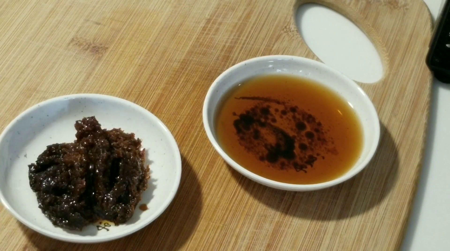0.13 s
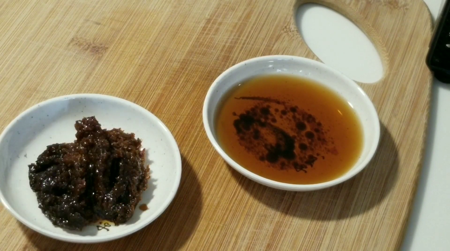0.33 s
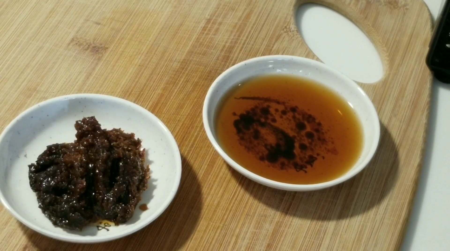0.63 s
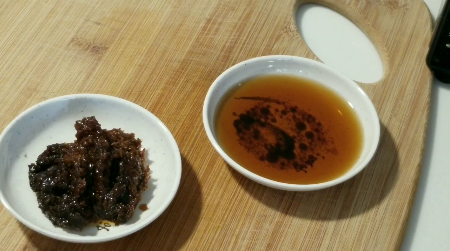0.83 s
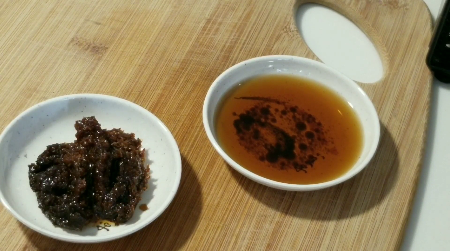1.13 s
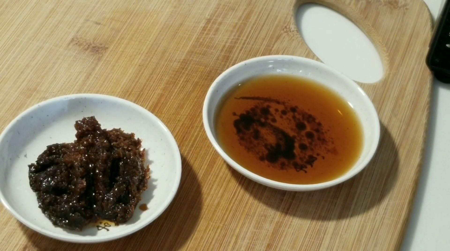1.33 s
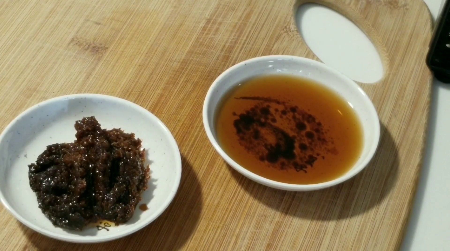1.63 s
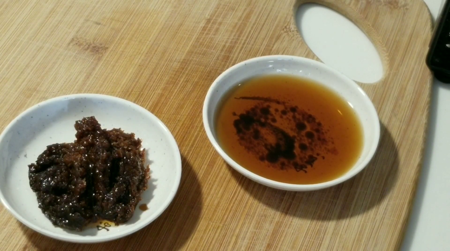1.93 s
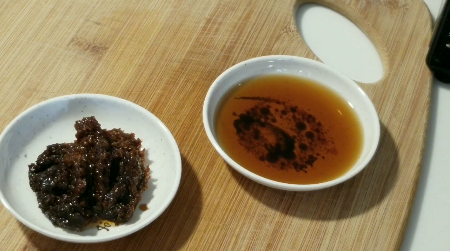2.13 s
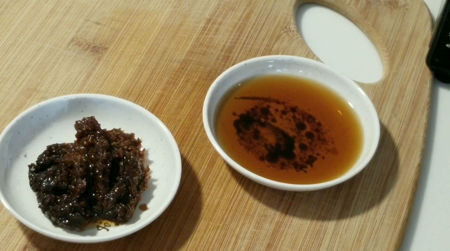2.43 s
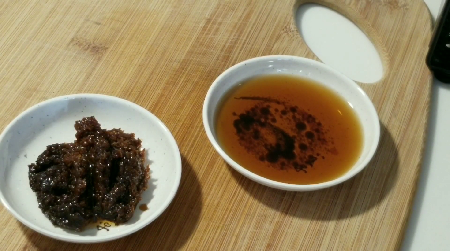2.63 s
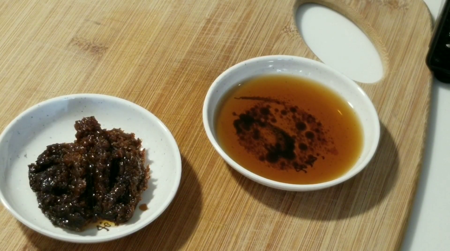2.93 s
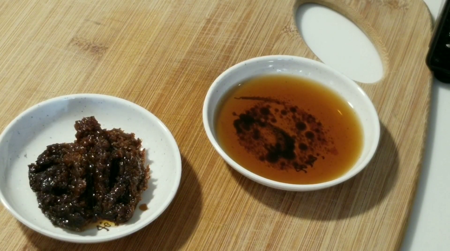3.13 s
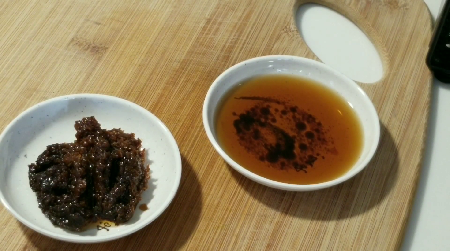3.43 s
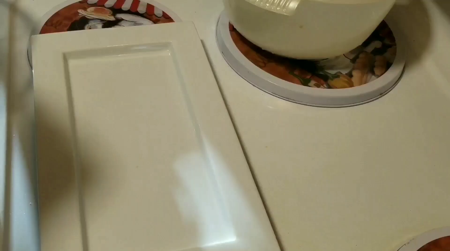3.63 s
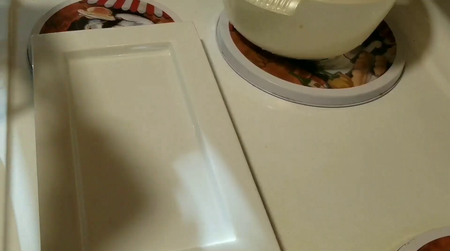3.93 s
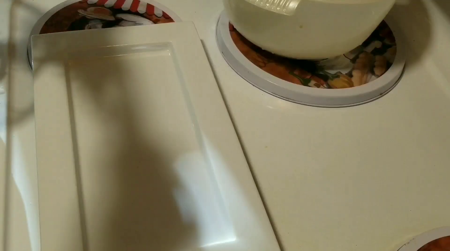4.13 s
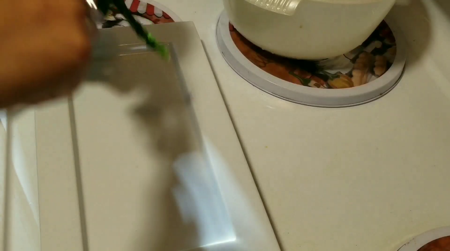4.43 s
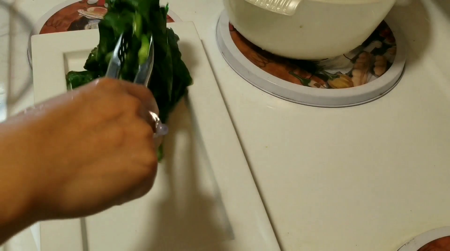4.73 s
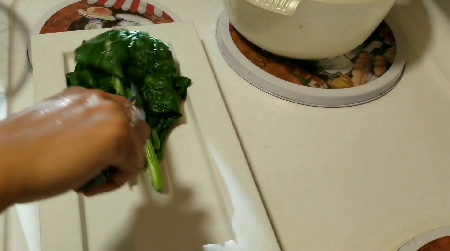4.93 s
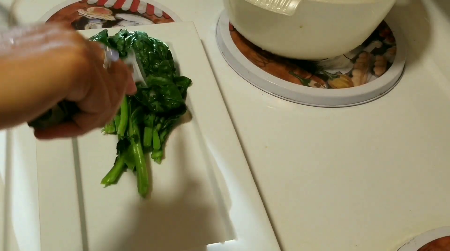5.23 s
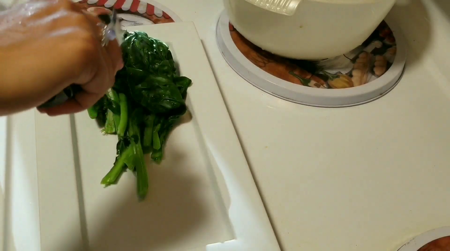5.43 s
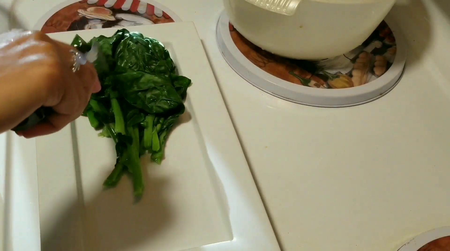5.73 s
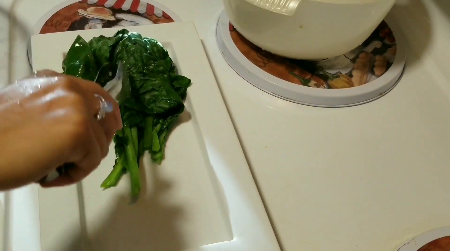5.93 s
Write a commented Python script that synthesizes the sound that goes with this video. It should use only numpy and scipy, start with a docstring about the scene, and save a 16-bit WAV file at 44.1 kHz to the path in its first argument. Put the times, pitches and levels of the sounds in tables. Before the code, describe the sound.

A small dish is set down hard and slid, a spoon clinks as dishes rock, then metal tongs click once over a faint hum.

```python
"""A kitchen counter in a small hard room, a two-port stereo microphone close by. First a dish is set down
hard, so that dish and counter ring, and is slid along. From 1.6 s a spoon clinks in a small dish; a dish
rocks on its foot, taps a board and is dragged. At 3 s we cut to a second spot with its own hum and air
noise: a faint far ping, wet leaves rustling and, near 4.9 s, metal tongs ticking on a tray."""
import sys
import numpy as np
from scipy import signal
from scipy.fft import rfft, irfft, next_fast_len
from scipy.io import wavfile
from scipy.ndimage import uniform_filter1d

SR = 44100
rng = np.random.default_rng(int(sys.argv[2]) if len(sys.argv) > 2 else 0)


def store_wav(level_fs):
    """Save 16-bit WAV to argv[1]."""
    pcm = np.round(np.clip(np.atleast_2d(level_fs), -1, 1) * 32767)
    wavfile.write(sys.argv[1], SR, pcm.T.astype(np.int16))


N = 268216
TIME, PAD = np.arange(N) / SR, next_fast_len(N)
FFT_HZ = np.fft.rfftfreq(PAD, 1 / SR)
CUT_S = 2.985, 2.988  # crossfade from the first spot to the second
SCATTER_DB, RING_CHATTER = 2.5, .8  # spread of mode levels from blow to blow; phase roughness in radians

# microphone hiss, left port then right: spectrum (f/Hz, density/dB), level/dB
PORT_HISS = [([(1200, -28.5), (2500, -7.5), (3400, -15.5), (4600, -2.5), (7500, -1.5), (9400, -13),
             (10800, -7.5), (12200, 0.5), (14000, -6), (16000, -5)], -62), ([(1200, -30), (2500, -12.5),
             (3400, -11.5), (4600, -15.5), (7500, -9), (9400, -7.5), (10800, -9.5), (12200, 0), (14000, -5),
             (16000, -5.5)], -65)]
# background at each spot: air (f/Hz, density/dB), its level/dB, like (f/Hz, correlation of the ports,
# clipped to +-0.99 in use), pan (left minus right/dB), hum (f/Hz, level/dB)
COUNTER_SPOT = dict(air=[(15, -52), (25, 2.5), (39, -5.5), (59, -8.5), (87, -20), (108, -11), (174, -15),
                (231, -11.5), (250, -20.5), (374, -13.5), (902, -31), (1370, -33.5), (3000, -47.5),
                (3900, -68), (6600, -120)], air_db=-53.5, like=[(60, 4.5), (130, 0.75), (290, 0.87),
                (640, 0.5), (1410, -0.2), (3100, 0), (6820, -2)], pan_db=2, hum=[(59.2, -60),
                (118.4, -66.5), (220.7, -74.5), (12091, -89), (12155, -99)])
TRAY_SPOT = dict(air=[(15, -40), (25, -1.5), (54, -6.5), (87, -10), (134, -12), (250, -14.5), (277, -21),
             (430, -18), (547, -20), (1370, -33), (1890, -29), (2130, -42), (3000, -49.5), (3900, -86),
             (6600, -120)], air_db=-49, like=[(60, 0.99), (130, 0.87), (290, 0.62), (640, 0.63),
             (1410, 0.0096), (3100, 0.42), (6820, 0.17), (15000, 0.54)], pan_db=0.5, hum=[(47, -51.5),
             (59.5, -56.5), (93, -67.5), (140, -58), (186, -64.5), (280, -63.5), (328, -73), (651, -70.5),
             (748, -69.5)])
# ride on the first spot's background: t/s, gain/dB
BACKGROUND_SWELL = [(0, 2), (.7, -0.5), (2.3, -0.5), (2.8, 2), (3.1, 8.5)]
# room decay, before each source shortens it: f/Hz, t60/s
ROOM_T60 = [(150, 0.86), (1000, 0.87), (4000, 0.65), (9000, 0.65), (15000, 0.75)]
# scatter off things near the microphone: f/Hz, level against the direct sound/dB
CLUTTER = [(200, -11), (700, -8), (1500, -13), (3500, -14), (5000, -6), (8000, -1), (16000, -1)]
# balance of each source at the microphone: f/Hz, left minus right/dB
KNOCK_PAN = [(100, -2), (300, 2), (1000, 1.5), (4000, 5.5), (8000, 0.5), (13000, 1)]
CLINK_PAN = [(500, 1.8), (1300, 4.7), (3000, 2.8), (8000, 5.7), (13000, 0.95)]
TONG_PAN = [(1000, -0.33), (4000, 1), (13000, -0.56)]

# fingers in wet leaves: t/s, level/dB, half-width/s
RUSTLES = [(3.996, -68.5, 0.067), (4.166, -75, 0.029), (4.265, -69.5, 0.1), (4.483, -66, .04),
           (5.279, -61, 0.021), (5.342, -66.5, 0.053), (5.972, -66, 0.081)]
# modes of the tray and of the tong tips: f/Hz, level/dB, t60/s
TRAY_MODES = [(1100, -6, .03), (1610, 0, .05), (2060, 10, .1), (2150, 1, .06), (3320, -8, .04)]
TIP_MODES = [(4300, 0, 0.03), (4760, 1, 0.035), (5730, -6, .04), (6560, 7, 0.046), (9000, 3, .035)]
# the tips rattle: t/s, level/dB
TIP_RATTLES = [(4.888, -41), (4.892, -40), (4.896, -42)]
# bright metallic snaps of tongs and spoon: t/s, level/dB, decay/ms
TONG_SNAPS = [(4.884, -31, 6.1), (4.8874, -21.5, 9.8), (4.908, -31, 8.5), (4.921, -38, 11)]
SPOON_SNAPS = [(1.910, -32.5, 11), (1.941, -37, 9.1), (1.9553, -31.5, 6.6), (1.964, -41, 9.8)]
# colour of those snaps: f/Hz, density/dB
TONG_SNAP_SPECTRUM = [(710, -71), (1200, -25), (1730, -10), (3010, -15.5), (3900, -16), (4500, -1),
                      (5800, -8), (6720, -1), (8170, -6), (8700, 0), (11000, -2), (14800, -3),
                      (16000, -3.5)]
SPOON_SNAP_SPECTRUM = [(3000, -24), (6000, -5), (9000, 0), (12000, -4), (14500, 6), (16000, -8)]

# dull taps on the board: t/s, board/dB, hollow/dB, tick/dB
TAPS = [(2.255, -24.5, -55, -41), (2.275, -27.5, -43, -40), (2.351, -37.5, -55, -64),
        (2.397, -52, -58, -72), (2.441, -38.5, -51, -65), (2.56, -55, -49.5, -72), (2.578, -49, -53, -69),
        (2.595, -48, -48, -67), (2.665, -55, -50, -72), (2.908, -56, -47, -68), (2.970, -30, -26, -44),
        (2.979, -46, -33, -43)]
# modes of the board and of the air trapped under the dish: f/Hz, level/dB, t60/s
BOARD_MODES = [(960, 7, 0.015), (1010, 0, 0.022), (1256, 4, 0.025), (1344, -7, 0.085)]
HOLLOW_MODES = [(853, 0.5, 0.11), (956, -13.5, 0.11)]
# contact ticks on the board and on a small dish: f/Hz, density/dB
TAP_TICK_SPECTRUM = [(940, -33), (1600, -10), (2200, 3.5), (2800, -1), (3300, -35), (3800, -3.5),
                     (4300, -8), (5200, 0), (7470, -23), (16000, -20)]
CLINK_TICK_SPECTRUM = [(500, -4.5), (1000, 7), (2500, 6), (3300, -5.5), (4300, -1.5), (5200, 3),
                       (7000, -3.5), (9500, -7), (13000, -9.5), (16000, -7)]
# low, middle and high ring of the small dishes, one list each: f/Hz, level/dB, t60/s
SMALL_DISH_RINGS = [
    [(1990, 0, 0.066), (2070, -5, .12), (2210, -7, 0.24)],
    [(2697, -8, 0.5), (2745, -3, 0.13), (2930, -9, .1), (3310, -12, .1), (3570, -7, 0.09)],
    [(5040, -2, 0.25), (5200, -2, 0.06), (5840, -12, .1), (6520, -8, 0.1)],
]
# a dish rocks, the spoon rattling in it:
# t/s, body/dB, rings/dB, rattle/dB, tick/dB, body f/Hz, ring length factor, contact f/Hz, contact/dB
ROCKS = [(1.911, -34, -38, -30, -41, 1320, 1.1, 6860, -42.5),
         (1.924, -38, -48, -37, -37.5, 1356, 1.6, 2300, -56),
         (1.954, -18.5, -44, -43, -34.5, 1301, 1.3, 4140, -41.5),
         (1.968, -30, -51, -40, -51, 1267, 0.6, 3520, -49),
         (2.014, -43, -55, -60, -61, 1290, 1.1, 2390, -66),
         (2.024, -37.5, -50, -54, -43, 1283, 1.1, 3930, -57),
         (2.054, -16, -37, -58, -37, 1272, 0.25, 4000, -47),
         (2.064, -32.5, -35, -57, -41, 1210, 1, 2320, -60),
         (2.091, -35, -45, -55, -43, 1330, 1.1, 5000, -48),
         (2.105, -27.5, -40, -57, -48, 1170, 0.44, 2780, -60),
         (2.112, -31, -59, -68, -54, 1192, 0.55, 2490, -51),
         (2.18, -36.5, -38.5, -63, -45, 1240, 0.45, 3720, -53),
         (2.187, -38.5, -45, -62, -49, 1038, 1.2, 2690, -53)]
# the spoon bounces: t/s, body/dB, low ring/dB, middle ring/dB, high ring/dB, tick/dB, ring length factor
SPOON_BOUNCES = [(1.62, -54, -58, -50, -62, -45, 0.39), (1.6302, -26.5, -34, -27, -34, -27, 0.51),
                 (1.649, -42, -40, -36.5, -41, -39, 0.46), (1.662, -42, -42, -40, -47, -39, 0.59),
                 (1.687, -49, -56, -38.5, -57, -46, 1), (1.785, -44, -41, -43, -62, -42, 0.18)]

# the dish is pushed along: scrape t/s, scrape/dB, scrape fade/(dB/s), rumble t/s, rumble/dB
PUSHES = [(0.421, -34.5, 153, 0.451, -37), (0.525, -35.5, 223.5, 0.51, -45)]
# its grating foot, its thin skid and the crack as it lands: f/Hz, density/dB
SCRAPE_SPECTRUM = [(150, -16), (250, -5.5), (501, -6.5), (761, -10.5), (875, -9), (1880, -3.5),
                   (2090, -7.5), (3010, -4), (5160, -15.5), (6940, -13.5), (16000, -38)]
SKID_SPECTRUM = [(1500, -9), (2300, -2), (3500, -1), (4800, 5), (6500, -3), (8500, 5), (11000, -12),
                 (16000, -20)]
CRACK_SPECTRUM = [(180, -30.5), (300, -8.5), (1060, -16.5), (1480, -29.5), (1720, -18), (2070, -14.5),
                  (3190, -10.5), (3400, -15.5), (3760, -9), (6960, -10), (11000, -16.5), (16000, -19.5)]
# it bumps the worktop: t/s, level/dB, f/Hz, t60/s, contact/ms
BUMPS = [(.176, -32, 299.4, 0.089, 8.8), (.412, -37, 201, 0.17, 11), (.445, -34.5, 201.5, 0.086, 15),
         (0.446, -36, 143, 0.16, 14), (.535, -36.5, 509, 0.092, 15), (.55, -39, 145.5, 0.68, 32)]
# it is set down: t/s, counter level/dB, thud and crack against that/dB, dish level/dB,
# favoured f/Hz, favoured spread/octaves
KNOCKS = [(0.1703, -20.5, -16.5, 1, -30.5, 3400, 0.094), (0.1736, -8, -20.5, -6.5, -9, 3480, 0.2),
          (0.4138, -29, -19.5, 13.5, -23, 2650, 0.23), (.525, -29.5, -8, 9, -31.5, 1900, 0.22)]
# modes of the counter, of the worktop's low thud and of the dish: f/Hz, level/dB, t60/s
COUNTER_MODES = [(515, -9, 0.13), (694.3, -11.5, 0.063), (832, -6.5, 0.08), (1059, -8.5, 0.058),
                 (1304, -9, 0.0604), (1521, -2.5, 0.06), (1918, -5, 0.055), (2016, -7.5, 0.08),
                 (2100, -3, 0.08), (2330, -7.5, 0.035), (2360, -9, 0.055), (2740, -4.5, 0.0808),
                 (3080, -4.5, 0.06), (3813, -17, 0.049), (3980, -9, 0.0482), (4430, -11, 0.05),
                 (4800, -13, .04), (5140, -14, .05), (5580, -6, 0.045), (6218, -14.5, 0.036),
                 (6600, -8.5, .045), (7670, -15, 0.04), (10100, -13.5, 0.03)]
THUD_MODES = [(93.6, -2, 0.19), (140, -7.5, 0.44), (201, -4.5, .25), (382, -3, 0.08), (515, -11.5, 0.11)]
DISH_MODES = [(1530, -9, .07), (1880, 0, 0.14), (2120, -7.5, 0.084), (2940, -2.5, 0.12), (3418, 6, 0.07),
              (3498, 0.5, 0.09), (6800, -10, 0.033), (7600, -8, .03)]


def undb(db):
    return 10 ** (np.asarray(db) / 20)


def over(table, hz):
    """Reads a (f/Hz, value) table on a log frequency axis."""
    freqs, values = np.transpose(table)
    return np.interp(np.log(hz + 1), np.log(freqs + 1), values)


def noise(spectrum, size=N):
    """Noise of rms 1, coloured by (f/Hz, density/dB)."""
    pad = next_fast_len(size)
    colour = undb(over(spectrum, np.fft.rfftfreq(pad, 1 / SR)))
    out = irfft(rfft(rng.standard_normal(pad)) * colour, pad)[:size]
    return out / np.sqrt(np.mean(out ** 2))


def walk(rate_hz):
    """Smooth random drift, spread near 1."""
    hold = int(SR / rate_hz)
    steps = np.repeat(rng.standard_normal(N // hold + 1), hold)
    return 1.6 * uniform_filter1d(uniform_filter1d(steps, hold), hold)[:N]


def peak(s, db, rise_db_s, fall_db_s):
    """Gain that climbs to a peak and falls away, both straight in dB."""
    return undb(db - np.where(TIME < s, rise_db_s * (s - TIME), fall_db_s * (TIME - s)))


def ring(modes, contact_ms, stretch=1, scatter_db=-3.5, chatter=.26):
    """Modes (f/Hz, level/dB, t60/s) after a blow: each lands elsewhere; loose contact roughens them."""
    t = TIME[:SR // 4]
    hz, db, t60 = np.transpose(modes)[..., None]
    level_draw, pitch_draw = rng.standard_normal((2, len(modes), 1))
    steps = rng.standard_normal((len(modes), 64))  # about 4 ms a step
    rough = np.array([np.interp(t, np.linspace(0, t[-1], 64), row) for row in steps])
    phase = 2 * np.pi * hz * (1 + .0047 * pitch_draw) * t + chatter * rough
    tones = undb(db + scatter_db * level_draw) * np.sin(phase)
    decay = np.exp(-np.log(1000) * np.maximum(t - contact_ms / 1000, 0) / (t60 * stretch))
    push = np.sin(np.pi / 2 * np.minimum(1000 * t / contact_ms, 1)) ** 2  # force builds over the contact
    out = (tones * decay).sum(0) * push
    return out / np.abs(out).max()


def burst(spectrum, decay_ms, rise_ms=.26):
    """A short spit of coloured noise."""
    ms = 1000 * TIME[:SR // 4]
    return noise(spectrum, len(ms)) * np.exp(-ms / decay_ms) * np.minimum(ms / rise_ms, 1) / 2


def add(out, sound, s):
    """Lays a sound in at a time."""
    start = int(s * SR)
    out[start:start + len(sound)] += sound[:len(out) - start]


def hiss():
    """The electronics of each microphone port hiss on their own."""
    return np.array([undb(db + .5 * walk(8.6)) * noise(spectrum) for spectrum, db in PORT_HISS])


def room_tone(air, air_db, like, pan_db, hum):
    """Air noise, partly alike at the two ports and drifting octave by octave, with wavering hum lines."""
    correlation = np.clip(over(like, FFT_HZ), -.99, .99)
    mid = rfft(noise(air, PAD)) * np.sqrt((1 + correlation) / 2)
    side = rfft(noise(air, PAD)) * np.sqrt((1 - correlation) / 2)
    ports = np.array([mid + side, mid - side])
    out = np.zeros((2, N))
    for hz, db in hum:
        amplitude = np.sqrt(2) * undb(db + .44 * walk(4.1))
        pitch = hz * (1 + .0087 * walk(4.6))
        out += amplitude * np.sin(2 * np.pi * np.cumsum(pitch) / SR)
    for octave in np.arange(4, 15) + .5:
        band = np.clip(1 - np.abs(np.log2(FFT_HZ + 1) - octave), 0, 1)
        out += irfft(ports * band, PAD)[:, :N] * undb(air_db + walk(6.3))
    return out * undb([[pan_db / 2], [-pan_db / 2]])


def room_reverb(dry, t60_scale):
    """The hard room answers with a separate noise-like tail at each port."""
    t = TIME[:SR // 2]
    hz = np.fft.rfftfreq(len(t), 1 / SR)
    tail = 0
    for octave in np.arange(5, 15):
        share = np.clip(1 - np.abs(np.log2(hz + 1) - octave), 0, 1)
        band = irfft(rfft(rng.standard_normal((2, len(t)))) * share, len(t))
        t60 = t60_scale * over(ROOM_T60, 2. ** octave)
        tail = tail + band * np.exp(-np.log(1000) * t / t60)
    tail *= np.minimum(t / .003, 1)  # the first walls answer after a few ms
    tail /= np.sqrt((tail ** 2).sum() / 2)
    return signal.fftconvolve(dry[None], tail, axes=1)[:, :N]


def at_microphone(dry, pan, lag_samples, room_db, t60_scale):
    """Direct sound, later at the right port, plus scatter off nearby things and the room's tail."""
    room = undb(room_db) * rfft(room_reverb(dry, t60_scale), PAD)
    delay = np.exp(-2j * np.pi * FFT_HZ * np.array([[0], [lag_samples]]) / SR)
    direct = rfft(dry, PAD) * delay
    echoes = rng.standard_normal((2, SR // 50)) * np.exp(-TIME[:SR // 50] / .006)
    echoes /= np.sqrt((echoes ** 2).sum() / 2)
    scatter = undb(over(CLUTTER, FFT_HZ)) * rfft(echoes, PAD)
    left_gain = undb(over(pan, FFT_HZ) / 2)
    balance = np.array([left_gain, 1 / left_gain])
    return irfft((direct * (1 + scatter) + room) * balance, PAD)[:, :N]


def far_ping():
    """Two modes ring faintly, far from the microphone."""
    out = np.zeros(N)
    add(out, undb(-56) * ring([(1330, 0, .12), (2430, -4, .08)], contact_ms=6.46), s=3.962)
    return out


def leaves():
    """Wet leaves rustle under the fingers in swells of fine grains."""
    swell = sum(undb(db) * np.exp(-((TIME - s) / width) ** 2) for s, db, width in RUSTLES)
    grains = undb(2.5 * walk(200))
    spectrum = [(2000, -25), (4500, 0), (7500, 2.5), (9500, -2), (12500, -3), (16000, -13)]
    return swell * grains * noise(spectrum)


def tongs():
    """Metal tips strike the tray, snap and rattle."""
    out = np.zeros(N)
    tray = ring(TRAY_MODES, contact_ms=6, scatter_db=SCATTER_DB, chatter=.6)
    add(out, undb(-33.5) * tray, s=4.888)
    for s, db, decay_ms in TONG_SNAPS:
        add(out, undb(db) * burst(TONG_SNAP_SPECTRUM, decay_ms, rise_ms=2), s)
    for s, db in TIP_RATTLES:
        add(out, undb(db) * ring(TIP_MODES, contact_ms=1.2, chatter=RING_CHATTER), s)
    return out


def drag(end_s=2.972):
    """A dragged dish grates louder and louder up to its last taps; the high grate flares on the way."""
    low = noise([(550, -25), (760, -.5), (850, 1), (960, -3), (1200, -35.5)])
    high = noise([(1000, -28), (1180, 8), (1310, -34), (1460, 5), (1750, -43)])
    swell = peak(end_s, 0, rise_db_s=170, fall_db_s=0) * (TIME < end_s)
    flare = undb(-62) * np.exp(-((TIME - 2.85) / .15) ** 2)
    grit = peak(end_s, -60, rise_db_s=152, fall_db_s=0) * noise(TAP_TICK_SPECTRUM) * (TIME < CUT_S[1])
    return grit + swell * undb(-47) * low + (swell * undb(-52) + flare) * high


def board_taps(contact_ms=3.84):
    """A dish taps the board dully, sounding the board and the air trapped under its foot."""
    out = np.zeros(N)
    for s, board_db, hollow_db, tick_db in TAPS:
        board = undb(board_db) * ring(BOARD_MODES, contact_ms, scatter_db=SCATTER_DB)
        tick = undb(tick_db) * burst(TAP_TICK_SPECTRUM, decay_ms=12)
        hollow = undb(hollow_db) * ring(HOLLOW_MODES, contact_ms, scatter_db=SCATTER_DB)
        add(out, board + tick + hollow, s - .001)
    return out


def clink(body_hz, body_db, ring_dbs, tick_db, stretch):
    """One blow ticks on a small dish and stirs its body and three upper rings."""
    body_modes = [(body_hz, 0, .05), (1.214 * body_hz, -12, .035)]
    body = ring(body_modes, contact_ms=6.24, stretch=np.sqrt(stretch), scatter_db=SCATTER_DB)
    rings = sum(undb(db) * ring(modes, 2.3, stretch, SCATTER_DB, RING_CHATTER)
                for db, modes in zip(ring_dbs, SMALL_DISH_RINGS))
    tick = burst(CLINK_TICK_SPECTRUM, decay_ms=28 * stretch, rise_ms=1.4)
    return undb(body_db) * body + rings + undb(tick_db) * tick


def rocking_dish():
    """A dish rocks on its foot with the spoon rattling in it; each contact adds a brief ring."""
    out = np.zeros(N)
    for s, body_db, rings_db, rattle_db, tick_db, hz, stretch, contact_hz, contact_db in ROCKS:
        add(out, undb(contact_db) * ring([(contact_hz, 0, .035)], contact_ms=4.2, chatter=1.6), s)
        ring_dbs = rings_db, rings_db - 15, rattle_db  # low, middle, high
        add(out, clink(hz, body_db, ring_dbs, tick_db, stretch), s - .001)
    return out


def spoon(body_hz=1290):
    """A spoon bounces on a small dish, then snaps brightly as the dish rocks."""
    out = np.zeros(N)
    for s, body_db, *ring_dbs, tick_db, stretch in SPOON_BOUNCES:
        add(out, clink(body_hz, body_db, ring_dbs, tick_db, stretch), s - .001)
    for s, db, decay_ms in SPOON_SNAPS:
        add(out, undb(db) * burst(SPOON_SNAP_SPECTRUM, decay_ms, rise_ms=1.2), s)
    return out


def slide():
    """The foot of the dish skids, bumps, grates in uneven grains and shakes the counter's low modes."""
    grains = undb(2.5 * walk(149.9)) * noise(SCRAPE_SPECTRUM)
    rumble = noise([(110, -23), (145, 1), (172, -9), (203, 6),
                    (260, -28), (440, -20), (510, -21), (650, -30.5)])
    skid_swell = peak(.413, -34, rise_db_s=600, fall_db_s=4000) * (TIME > .391)
    out = skid_swell * noise(SKID_SPECTRUM)
    for s, db, hz, t60, contact_ms in BUMPS:
        add(out, undb(db) * ring([(hz, 0, t60)], contact_ms), s)
    for s, scrape_db, fade_db_s, rumble_s, rumble_db in PUSHES:
        out += peak(s, scrape_db, rise_db_s=2500, fall_db_s=fade_db_s) * grains
        out += peak(rumble_s, rumble_db, rise_db_s=302.5, fall_db_s=302.5) * rumble
    return out


def rebounds(count=3, first_gap_s=.0065, gap_growth=1.5, loss_db=6.5):
    """The hard second blow chatters on: further knock rows, each later and weaker."""
    s, db, thud_db, crack_db, dish_db, *favoured = KNOCKS[1]
    waits = np.cumsum(first_gap_s * gap_growth ** np.arange(count))
    return [(s + wait, db - loss_db * k, thud_db, crack_db, dish_db - 2 * loss_db * k, *favoured)
            for k, wait in enumerate(waits, 1)]


def knocks(contact_ms=3.1, treble_hz=6000):
    """The dish lands close by: the counter rings, thuds and cracks; the dish rings on its own track."""
    counter, dish = np.zeros(N), np.zeros(N)
    for s, db, thud_db, crack_db, dish_db, favoured_hz, spread in KNOCKS + rebounds():
        thud = undb(thud_db) * ring(THUD_MODES, contact_ms=9.2)
        body = ring(COUNTER_MODES, contact_ms, scatter_db=SCATTER_DB, chatter=1.59)
        crack = undb(crack_db) * burst(CRACK_SPECTRUM, decay_ms=7.7, rise_ms=1.2)
        add(counter, undb(db) * (body + thud + crack), s)
        modes = []
        for hz, level, t60 in DISH_MODES:  # a blow favours one pitch; the treble modes always sound
            loss_db = 6 * (np.log2(hz / favoured_hz) / spread) ** 2 if hz < treble_hz else 0
            modes.append((hz, level - loss_db, t60))
        add(dish, undb(dish_db) * ring(modes, contact_ms, chatter=.4), s)
    graze = ring([(2780, 0, .08)], contact_ms=2, chatter=.598)  # a faint touch before the first blow
    add(dish, undb(-49.5) * graze, s=.154)
    return counter, dish


def scene():
    """The microphone at the counter, then a cut to the tray; its hiss runs throughout."""
    counter, dish = knocks()
    first = at_microphone(counter + slide(), KNOCK_PAN, lag_samples=4, room_db=-2.5, t60_scale=.48)
    first += at_microphone(dish, KNOCK_PAN, lag_samples=1.8, room_db=-13, t60_scale=.45)
    swell_s, swell_db = np.transpose(BACKGROUND_SWELL)
    first += undb(np.interp(TIME, swell_s, swell_db, right=-120)) * room_tone(**COUNTER_SPOT)
    small_dishes = spoon() + rocking_dish() + board_taps() + drag()
    first += at_microphone(small_dishes, CLINK_PAN, lag_samples=13, room_db=-18, t60_scale=.6)
    tray_sounds = tongs() + far_ping() + leaves()
    second = at_microphone(tray_sounds, TONG_PAN, lag_samples=2.93, room_db=-14, t60_scale=.45)
    second += room_tone(**TRAY_SPOT)
    fade = np.interp(TIME, CUT_S, (0, 1))
    return (1 - fade) * first + fade * second + hiss()


def record(dry):
    """The recorder cuts the bass below 39 Hz and the top above 15.9 kHz."""
    low_cut = signal.butter(6, 39, "high", fs=SR, output="sos")
    high_cut = signal.ellip(10, .2, 70, 15900, fs=SR, output="sos")
    return signal.sosfilt(high_cut, signal.sosfilt(low_cut, dry))


dry = scene()
out = record(dry)
store_wav(out)
```